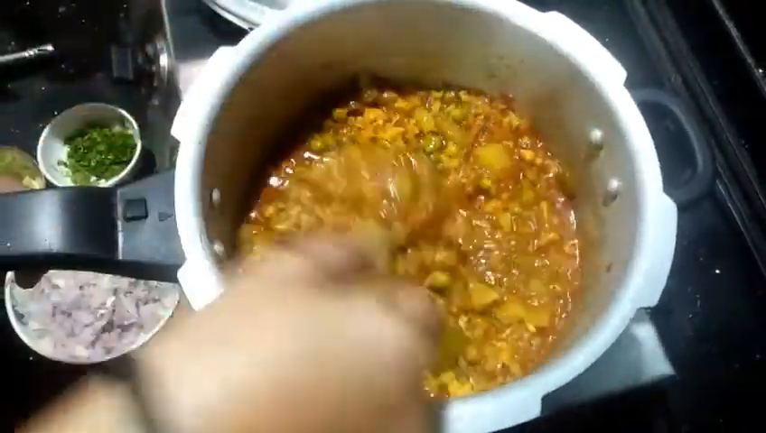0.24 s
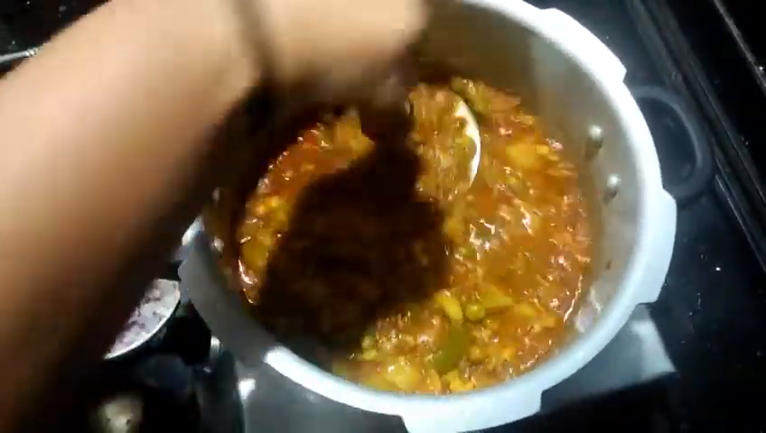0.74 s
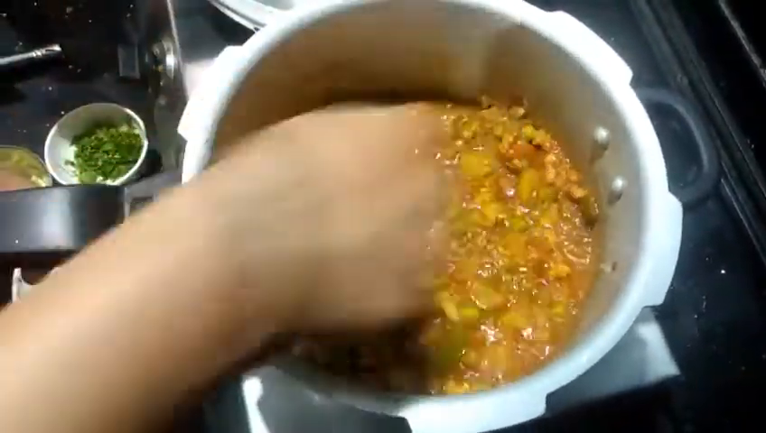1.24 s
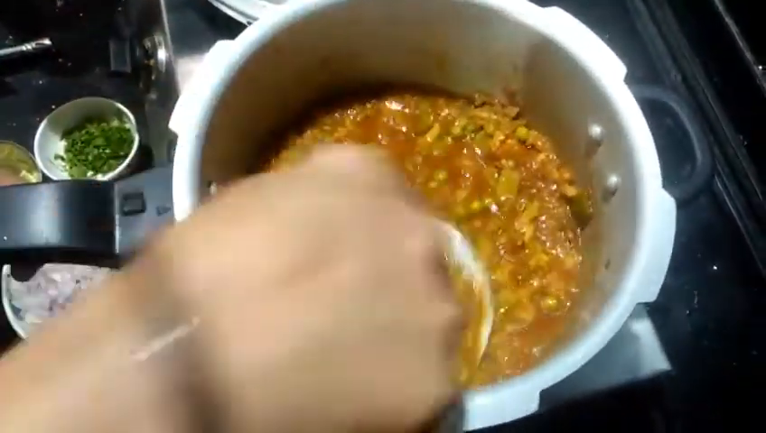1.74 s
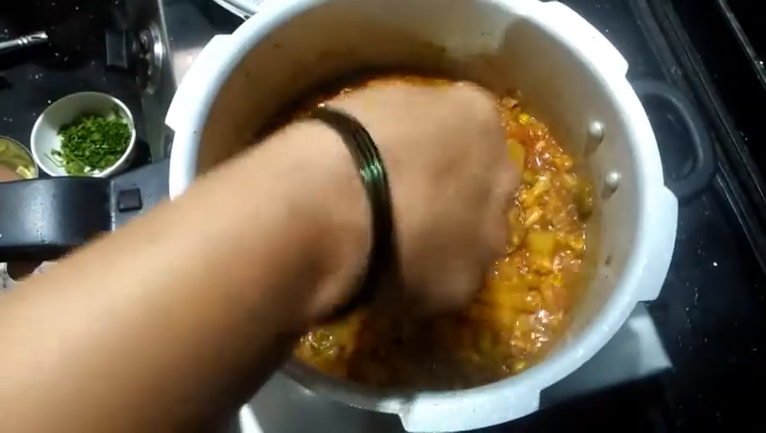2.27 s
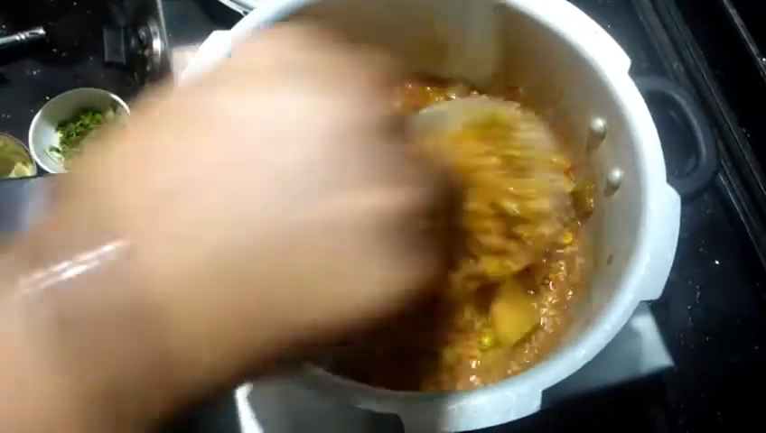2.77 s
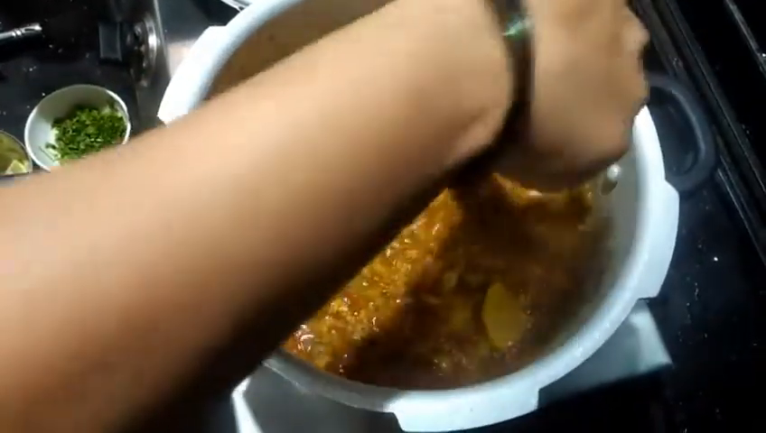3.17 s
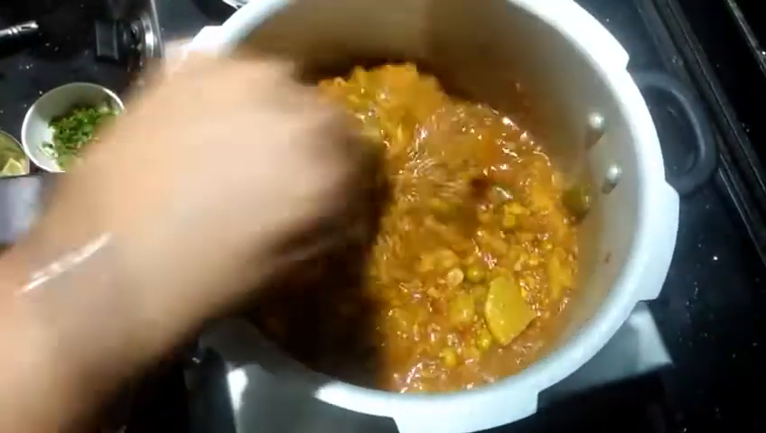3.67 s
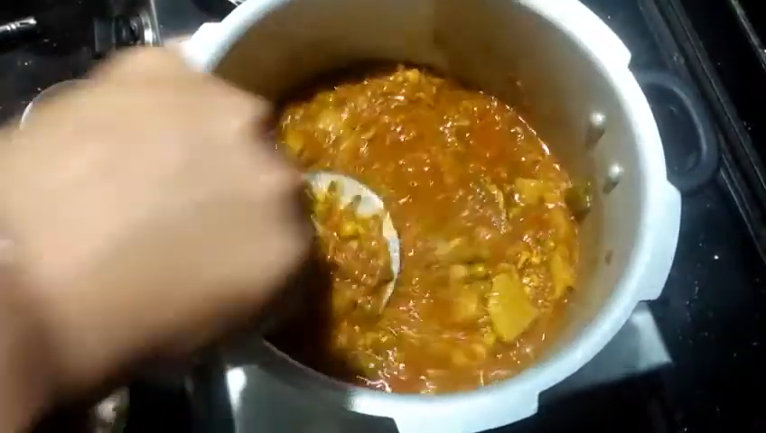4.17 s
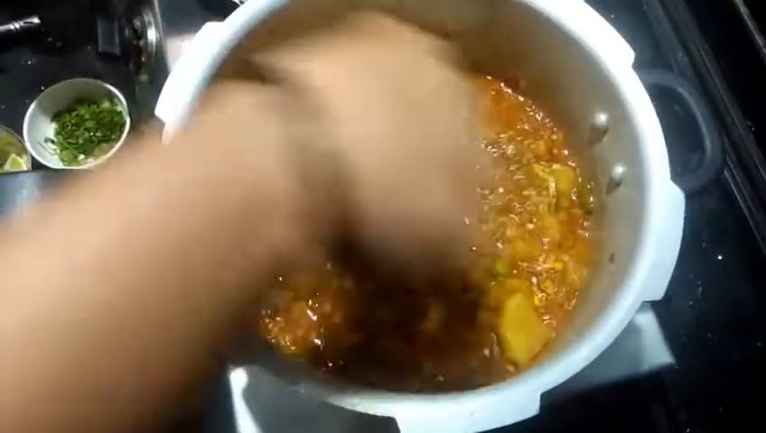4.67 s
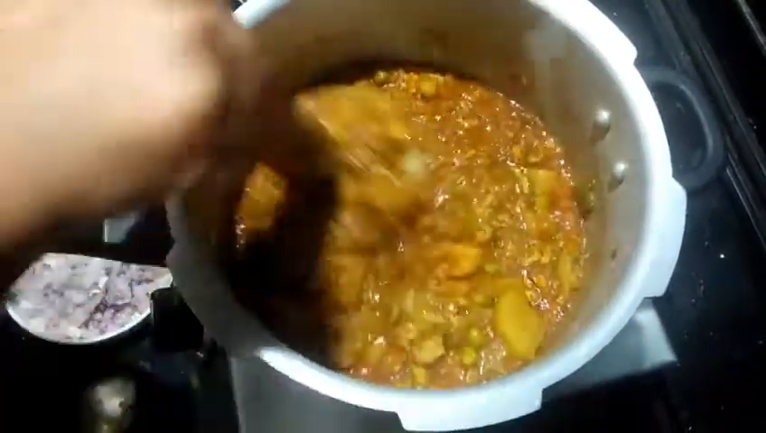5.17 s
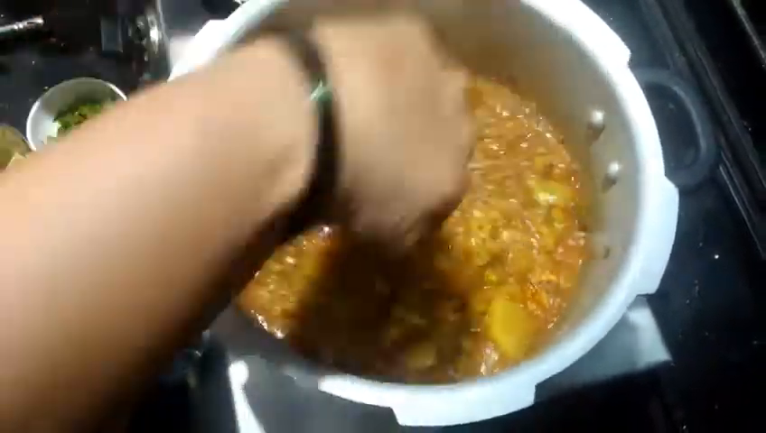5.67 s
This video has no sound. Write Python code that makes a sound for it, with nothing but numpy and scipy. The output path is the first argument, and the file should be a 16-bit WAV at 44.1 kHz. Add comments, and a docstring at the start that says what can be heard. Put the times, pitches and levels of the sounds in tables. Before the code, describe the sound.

A few dull metal knocks on a cooking pot punctuate the quiet squelching and bubbling of thick vegetable stew being mashed.

```python
"""Thick, wet stew gloops and crackles as a steel masher works through it in a heavy metal pot.
Air pockets pop or squirt out through the mash. Now and then the masher drags over the bottom
or knocks against the pot, whose ring the food damps. A small kitchen adds a short echo,
and a low rumble and a faint hiss lie underneath."""
import sys
import numpy as np
from scipy import signal
from scipy.fft import rfft, irfft, next_fast_len
from scipy.io import wavfile
from scipy.ndimage import uniform_filter1d

SR = 44100
rng = np.random.default_rng(int(sys.argv[2]) if len(sys.argv) > 2 else 0)


def transcribe(u):
    """Save the signal u as a 16-bit wav file named by the first command-line argument.

    u: samples, shape (n,) or (channels, n), limited to [-1, 1]; the rate is SR.
    q: integer samples, one column per channel.
    """
    v = np.clip(np.atleast_2d(u).T, -1, 1)
    q = np.round(v * 32767).astype(np.int16)
    wavfile.write(sys.argv[1], SR, q)


N = 261104
T = np.arange(N) / SR  # the time of each sample, in seconds


# tone of the large, small and tiniest air pockets: pitch_hz, relative_db
GLOOP_TONE = [(130, -9), (190, -2), (235, -14.5), (290, -2.5), (380, -6.5), (480, 2.5), (620, 8.5),
              (800, -13), (1200, -24.5)]
BUBBLING_TONE = [(200, -35), (400, -18.5), (620, -6.5), (850, 0.5), (1250, -0.5), (1600, 0.5), (1950, 0.5),
                 (2300, -6), (2700, -2), (3500, -18.5), (7000, -46.5)]
CRACKLE_TONE = [(1800, -12.5), (3200, 2.5), (4500, -0.5), (6000, 0), (8500, 4.5), (10000, -1.5),
                (14000, 2.5)]
# how hard the mash is worked: time_s, bubbling_db, crackle_db
MASHING_EFFORT = [(0.0, -64, -78), (0.53, -62.5, -78.5), (0.69, -59.5, -82), (0.89, -59.5, -75.5),
                  (1.12, -61, -71.5), (1.29, -68, -78.5), (1.52, -65, -77), (1.66, -65.5, -78),
                  (1.88, -57.5, -62.5), (2.08, -54, -74.5), (2.32, -62.5, -82), (2.54, -62, -78.5),
                  (3.1, -59, -70.5), (3.26, -54.5, -68.5), (3.46, -58, -74), (3.64, -60.5, -79.5),
                  (3.94, -69, -81.5), (4.34, -64.5, -78), (4.63, -66, -81.5), (5.13, -73.5, -86.5),
                  (5.39, -74.5, -75.5), (5.54, -64.5, -79.5), (5.79, -70, -87), (5.92, -80, -101)]

def churn(usual_db=-64, gloop_share=0.76):
    """Large air pockets gloop, smaller ones bubble and wet films crackle, surging as lumps give way."""
    times, *levels = np.transpose(MASHING_EFFORT)
    lumps_db = 1.8 * drift(hz=9)
    bubbling_db, crackle_db = [np.interp(T, times, db) + lumps_db for db in levels]
    gloop_db = usual_db + gloop_share * (bubbling_db - usual_db)  # follows the bubbling, but swings less
    # sliding pulp smears the bubbles together: one noise for each size
    smear = from_db([[-5], [-5], [-3]]) * rng.standard_normal((3, N))
    large = bubble_cloud(170, 750, per_s=320, cycles=17, spread_db=1) + smear[0]
    small = bubble_cloud(620, 2700, per_s=960, cycles=14, spread_db=3.5) + smear[1]
    films = bubble_cloud(3200, 13000, per_s=2200, cycles=29, spread_db=3.5) + smear[2]
    return (from_db(gloop_db - 5) * shape_tone(large, GLOOP_TONE)
            + from_db(bubbling_db) * shape_tone(inside_pot(small), BUBBLING_TONE)
            + from_db(crackle_db - 0.5) * shape_tone(films, CRACKLE_TONE))


def bubble_cloud(low_hz, high_hz, per_s, cycles, spread_db, count=13):
    """Countless air pockets ring at random moments, over a range of pitches."""
    cloud = np.zeros(N)
    for hz in np.geomspace(low_hz, high_hz, count):
        openings = clicks(per_s / count, spread_db, N)
        cloud += signal.oaconvolve(openings, bubble(hz, cycles / hz))[:N]
    return unit_level(cloud)


def bubble(hz, fade_s, glide=0.1, opening_s=0.0032, wobble=0.049):
    """An air pocket rings and rises in pitch as it opens; its soft wall makes the pitch wobble."""
    t = T[:SR // 8]
    unrest = unit_level(filtered(rng.standard_normal(len(t)), hz / 6, "low"))
    pitch_hz = hz * (1 + glide * np.minimum(t / fade_s, 1) + wobble * unrest)
    phase = 2 * np.pi * np.cumsum(pitch_hz) / SR
    sound = np.sin(phase) * fade(t, fade_s) * (1 - np.exp(-t / opening_s)) ** 2
    return sound / np.abs(sound).max()


# the loudest air pockets popping: start_s, peak_db, pitch_hz
POPS = [(0.018, -37, 1750), (0.233, -51, 940), (0.280, -40, 1266), (0.290, -38, 1236), (0.408, -53, 2260),
        (0.576, -51.5, 1280), (0.636, -48, 910), (1.04, -51.5, 900), (1.62, -42.5, 1840), (2.07, -49, 840),
        (2.233, -41.5, 1326), (2.367, -40.5, 1298), (2.401, -52.5, 2400), (2.598, -44.5, 1863),
        (2.698, -47.5, 1420), (2.747, -47, 1174), (2.806, -44, 1157), (2.847, -46, 1230),
        (2.877, -39, 1197), (2.967, -44.5, 1180), (2.972, -48, 1800), (3.074, -41, 2540),
        (3.111, -35, 1315), (3.263, -40, 1114), (3.543, -47, 1285), (3.6, -47.5, 870), (3.691, -49.5, 1400),
        (3.880, -47.5, 1875), (4.015, -52, 1206), (4.099, -44, 963), (4.481, -47, 1226), (4.72, -51, 1240),
        (4.751, -50, 1490)]

def pops(tear_db=-16, stretch_s=0.004, cycles=46):
    """The film over an air pocket stretches and tears with a rasp, then the hollow rings."""
    out, t = np.zeros(N), T[:SR // 8]
    for start_s, db, hz in POPS:
        tears = clicks(per_s=2500, spread_db=5, size=len(t))
        rasp = unit_level(filtered(tears, [hz / 1.5, hz * 1.5], "band", order=3))
        loudness = swell(t, 2 * stretch_s, rise_share=0.7, fade_s=0.06)
        add(out, start_s - stretch_s, from_db(db + tear_db) * rasp * loudness)
        add(out, start_s, from_db(db) * bubble(hz, cycles / hz))
    return out


# mash forced through the masher's plate: start_s, level_db, low_hz, high_hz, length_s
SQUIRTS = [(0.067, -67.5, 4070, 13000, 0.018), (0.413, -71, 3070, 13000, 0.1),
           (0.624, -65, 2980, 14000, 0.098), (1.503, -69.5, 3600, 10800, 0.025),
           (1.81, -50, 2260, 13400, 0.0035), (2.186, -68, 2960, 12500, 0.038),
           (2.919, -69, 4000, 14000, .025), (3.06, -49.5, 2200, 14000, 0.022),
           (3.102, -47, 1950, 8500, 0.031), (3.19, -49, 1650, 6600, 0.019),
           (3.572, -72.5, 4000, 12500, 0.073), (3.836, -67.5, 3010, 13500, 0.051),
           (4.101, -53.5, 5000, 14000, 0.021), (4.312, -55, 2860, 7100, 0.017),
           (4.46, -68.5, 2410, 8900, 0.044), (4.559, -69, 5010, 13100, 0.029),
           (5.286, -67, 5880, 14000, 0.043), (5.327, -49, 2890, 14000, 0.019),
           (5.35, -52.5, 2330, 11000, 0.02)]

def squirts():
    """Many tiny bursts run together into a fizz that swells and dies away."""
    out, t = np.zeros(N), T[:SR // 2]
    for start_s, db, low_hz, high_hz, length_s in SQUIRTS:
        bursts = clicks(per_s=5500, spread_db=3.5, size=len(t))
        fizz = unit_level(filtered(bursts, [low_hz, high_hz], "band", order=3))
        add(out, start_s, from_db(db) * fizz * swell(t, length_s, rise_share=0.6, fade_s=0.11))
    return out


# tone of the many brief vibrations of masher and pot: pitch_hz, relative_db
CLATTER_TONE = [(120, -32), (500, -15), (850, -4.5), (1100, 2.5), (1400, 4), (2050, 1), (2350, -6.5),
                (2750, -14), (3500, -5.5), (4500, -14.5), (7000, -11), (10000, -21), (14000, -28)]
# the masher hitting the pot: start_s, level_db, brightness_hz, thud_boost_db, echo_send_db
KNOCKS = [(0.018, -50, 3840, 7, -4), (0.706, -22, 12400, -9.5, -6.5), (1.8734, -24.5, 6400, -6, -20),
          (2.103, -34, 1650, -25, -27), (2.112, -32.5, 1640, -10, -9), (3.075, -47, 12100, 0, 6.5),
          (4.1902, -16.5, 13500, -0.5, -9.5), (4.1953, -19.5, 4030, 2, -3)]

def knocks():
    """Steel cracks and clatters, and the pot rings. Gives the direct sound and its spill into the room."""
    direct, spill, t = np.zeros(N), np.zeros(N), T[:SR * 2 // 5]
    for start_s, db, brightness_hz, thud_db, echo_db in KNOCKS:
        # a blow on the bottom thuds more than one on the wall
        body = from_db(-7) * pot_ring(t, uneven_db=2, thud_db=thud_db)
        clatter = from_db(-4) * shape_tone(rng.standard_normal(len(t)), CLATTER_TONE) * fade(t, 0.17)
        crack = from_db(-1) * filtered(rng.standard_normal(len(t)), 4500, "high") * fade(t, 0.012)
        # food caught under the masher softens the contact
        blow = from_db(db) * filtered(body + clatter + crack, [140, brightness_hz], "band", order=3)
        add(direct, start_s, blow)
        add(spill, start_s, blow * from_db(echo_db))
    return direct, spill


def squashes(squash_db=-26, lead_s=0.0041):
    """Just before each knock the plate squashes the food trapped under it."""
    out, t = np.zeros(N), T[:SR // 8]
    for knock_s, db, *_ in KNOCKS:
        bursts = clicks(per_s=3600, spread_db=-3.5, size=len(t))
        pulp = unit_level(filtered(bursts, [550, 2200], "band"))
        loudness = swell(t, lead_s, rise_share=0.94, fade_s=0.069)
        add(out, knock_s - lead_s, from_db(db + squash_db) * pulp * loudness)
    return out


# the notes of the pot with food in it: pitch_hz, relative_db, fade_s
POT_NOTES = [(181.4, -17, .2), (271.4, -14.5, 0.2), (324, -19, 0.39), (421, -14.5, 0.21), (597, -14.5, .08),
             (733, -15, 0.17), (866, -11.5, 0.088), (885, -14.5, .18), (1052.7, -4.5, 0.17),
             (1172, -10.5, 0.23), (1283, -7, .18), (1352, -7.5, 0.27), (1410, -14, .06), (1575, -5, 0.2),
             (1780, -13, .1), (1860, -10, 0.16), (1917, -6.5, 0.18), (1960, -9.5, 0.25), (2074, -8.5, .16),
             (2175, -14.5, .16), (2960, -22, 0.15), (3388, -19.5, .07), (3670, -28.5, .1), (3630, -28, .13),
             (6200, -24, 0.092), (7270, -21.5, 0.079)]

def pot_ring(t, uneven_db, thud_db=0, thud_below_hz=500):
    """Each blow lands somewhere else, so it wakes the pot's notes with strengths of its own."""
    hz, db, fade_s = np.transpose(POT_NOTES)[:, :, None]
    db = db + thud_db * (hz < thud_below_hz) + uneven_db * rng.standard_normal(hz.shape)
    strength = from_db(db) * rng.choice([-1, 1], hz.shape)
    return np.sum(strength * np.sin(2 * np.pi * hz * t) * fade(t, fade_s), axis=0)


def inside_pot(sound, ring_db=-8):
    """The pot answers a sound inside it with its own notes."""
    answer = signal.oaconvolve(sound, pot_ring(T[:SR // 2], uneven_db=3))[:N]
    return unit_level(sound) + from_db(ring_db) * unit_level(answer)


# the plate dragged over the bottom, and the pot's low thud after the hardest knock:
# start_s, level_db, low_hz, high_hz, length_s
DRAGS_AND_THUD = [(0.72, -52.5, 148, 500, 0.03), (0.835, -54, 383, 830, 0.077),
                  (1.415, -63.5, 596, 774, 0.19), (3.075, -51, 200, 770, 0.11),
                  (3.337, -60.5, 397, 1120, 0.036), (3.593, -50.5, 230, 705, 0.039),
                  (4.2, -52.5, 150, 219, 0.063), (4.229, -34, 520, 1680, 0.072),
                  (4.62, -53.5, 222, 480, 0.093), (4.658, -63, 740, 913, 0.1),
                  (4.78, -68, 1514, 1620, 0.044), (5.465, -58.5, 2010, 2720, 0.095),
                  (5.588, -57, 200, 331.3, 0.052), (5.689, -68.5, 170, 520, 0.18)]

def drags_and_thud():
    """The plate sticks and slips, ringing one range of the pot's notes; the thud is made the same way."""
    out, t = np.zeros(N), T[:SR // 2]
    for start_s, db, low_hz, high_hz, length_s in DRAGS_AND_THUD:
        slips = clicks(per_s=3000, spread_db=3.5, size=2 * len(t) - 1)
        body = unit_level(signal.fftconvolve(slips, pot_ring(t, uneven_db=2), "valid"))
        grit = shape_tone(slips[:len(t)], CLATTER_TONE)
        rub = filtered(body + grit, [low_hz, high_hz], "band", order=3)
        # even out the level, so the swell alone shapes it
        rub /= np.sqrt(uniform_filter1d(rub ** 2, size=SR // 20) + 1e-18)
        add(out, start_s, from_db(db) * rub * swell(t, length_s, rise_share=0.25, fade_s=0.18))
    return out


# tone of the kitchen's echo: pitch_hz, gain_db
KITCHEN_TONE = [(100, 0.5), (700, 1.5), (1500, -11.5), (3000, 3), (6000, -1), (10000, -7), (14000, -0.5)]

def kitchen(sound, build_s=0.011):
    """Reflections in the room swell, then die away, each range of pitches at its own pace."""
    t, echo = T[:SR * 3 // 4], 0
    edges_hz = np.geomspace(80, 18000, 15)
    for low, high in zip(edges_hz, edges_hz[1:]):
        hz = np.sqrt(low * high)
        fade_s = at_pitch([(400, 0.17), (1500, 0.24), (5000, 0.3)], hz)
        noise = filtered(rng.standard_normal(len(t)), [low, high], "band")
        band = unit_level(noise * fade(t, fade_s) * (1 - np.exp(-t / build_s)))
        width_gain = np.sqrt(2 * (high - low) / SR / len(t))  # wider bands carry more energy
        echo = echo + band * width_gain * from_db(at_pitch(KITCHEN_TONE, hz))
    return signal.oaconvolve(sound, echo)[:N]


# rise and fall of the low rumble: time_s, level_db
RUMBLE_LEVELS = [(0.0, -60.5), (0.33, -68.5), (0.79, -63), (1.35, -71), (1.45, -67), (2.46, -71),
                 (3.69, -62.5), (4.1, -71.5), (4.25, -58), (4.47, -75), (4.68, -63), (4.9, -80),
                 (5.13, -65), (5.92, -61)]
# tone of the rumble and of the hiss: pitch_hz, relative_db
RUMBLE_TONE = [(20, -13.5), (35, -8.5), (55, 4.5), (75, -2.5), (110, -1.5), (170, -10.5), (260, -26),
               (600, -61.5)]
HISS_TONE = [(100, 1.5), (600, -1), (1800, 9), (3000, -3.5), (14000, -17.5)]

def background(hiss_db=-76):
    """An uneven low rumble and a faint steady hiss."""
    rumble_db = np.interp(T, *np.transpose(RUMBLE_LEVELS)) - 1 + 1.5 * drift(hz=6)
    rumble = from_db(rumble_db) * shape_tone(rng.standard_normal(N), RUMBLE_TONE)
    hiss = from_db(hiss_db) * shape_tone(rng.standard_normal(N), HISS_TONE)
    return rumble + hiss


def soften_faint_treble(sound, threshold_db=-68, slope=0.17, depth_db=4):
    """The treble dips whenever it is faint, which deepens the lulls and shortens the tails."""
    treble = signal.sosfiltfilt(signal.butter(4, 2800, "high", fs=SR, output="sos"), sound)
    power = uniform_filter1d(np.mean(treble ** 2, axis=0), size=int(0.02 * SR))
    level_db = 10 * np.log10(np.abs(power) + 1e-14)
    gain = from_db(np.clip(slope * (level_db - threshold_db), -depth_db, 0))
    return sound + (gain - 1) * treble


def from_db(db):
    """Turn decibels into a number to multiply by."""
    return 10 ** (np.asarray(db) / 20)


def unit_level(sound):
    """Scale a sound so that its average level (rms) is 1."""
    return sound / np.sqrt(np.mean(sound ** 2) + 1e-20)


def at_pitch(table, hz):
    """Read between a table's rows, with octaves evenly spaced."""
    pitches, values = np.transpose(table)
    return np.interp(np.log(np.maximum(hz, 1)), np.log(pitches), values)


def shape_tone(sound, tone):
    """Turn each pitch up or down as a tone table says; the result has level 1."""
    size = next_fast_len(len(sound))
    gains = from_db(at_pitch(tone, np.fft.rfftfreq(size, 1 / SR)))
    return unit_level(irfft(rfft(sound, size) * gains, size)[:len(sound)])


def filtered(sound, hz, keep, order=2):
    """Keep the "low" side, the "high" side or a "band" of pitches."""
    return signal.sosfilt(signal.butter(order, hz, keep, fs=SR, output="sos"), sound)


def fade(t, fade_s):
    """Die away by 60 dB in fade_s seconds."""
    return np.exp(-np.log(1000) * t / fade_s)


def swell(t, length_s, rise_share, fade_s):
    """Build up over a share of length_s, hold to its end, then die away."""
    return np.minimum(t / (rise_share * length_s), 1) * fade(np.maximum(t - length_s, 0), fade_s)


def clicks(per_s, spread_db, size):
    """Random clicks of uneven strength."""
    strength = from_db(spread_db * np.minimum(rng.exponential(1, size), 4))
    return (rng.random(size) < per_s / SR) * strength * rng.choice([-1, 1], size)


def drift(hz):
    """A slow random wander, mostly between -1 and 1."""
    count = int(2 * hz * N / SR) + 2
    return np.interp(T * 2 * hz, np.arange(count), rng.standard_normal(1000)[:count])


def add(track, start_s, sound):
    """Mix a sound into a track."""
    i = max(round(start_s * SR), 0)
    track[i:i + len(sound)] += sound[:N - i]


def scene():
    """The pot is straight ahead; only the treble of the echo differs between left and right."""
    mash = pops() + squirts() + squashes() + churn() + drags_and_thud()
    blows, spill = knocks()
    spill += from_db(-7) * mash
    middle = mash + blows + kitchen(spill) + background()
    side = from_db(2) * filtered(kitchen(spill), 6500, "high", order=12)
    return np.array([middle + side, middle - side])


def record(dry):
    """Soften faint treble, then cut steeply above 14600 Hz."""
    top_cut = signal.ellip(10, 0.2, 70, 14600, fs=SR, output="sos")
    return signal.sosfilt(top_cut, soften_faint_treble(dry))


dry = scene()
out = record(dry)
transcribe(out)
```